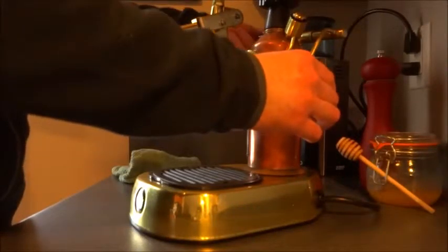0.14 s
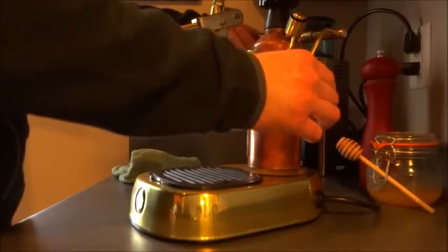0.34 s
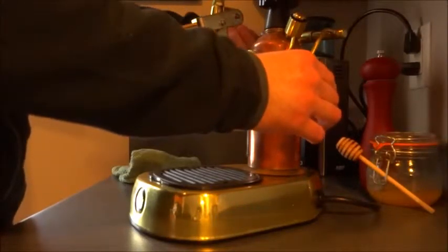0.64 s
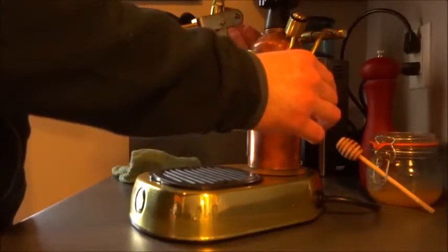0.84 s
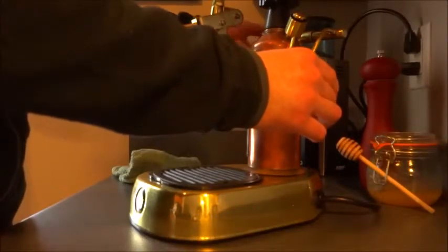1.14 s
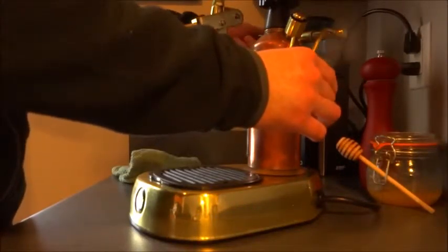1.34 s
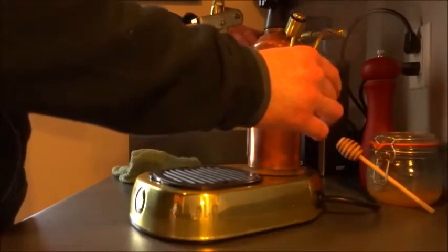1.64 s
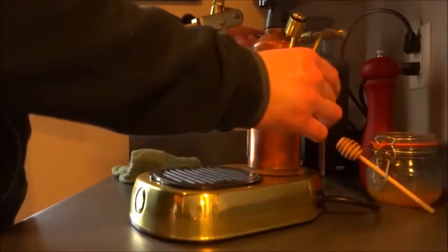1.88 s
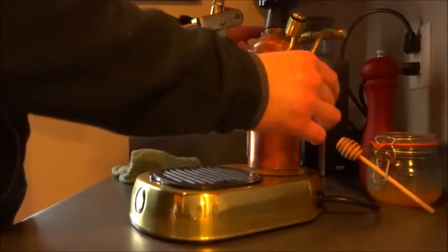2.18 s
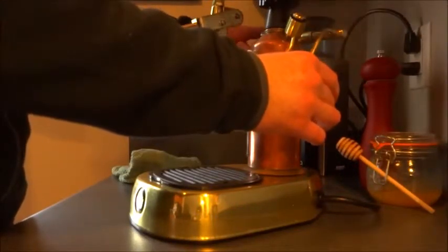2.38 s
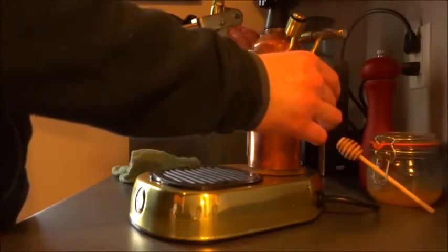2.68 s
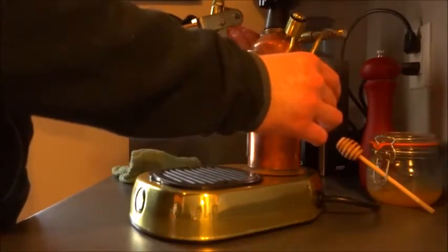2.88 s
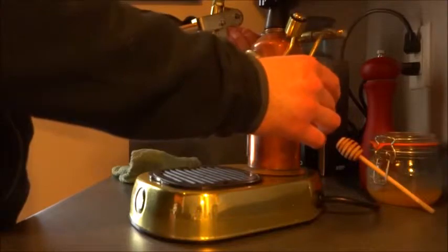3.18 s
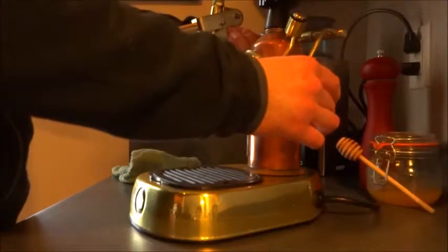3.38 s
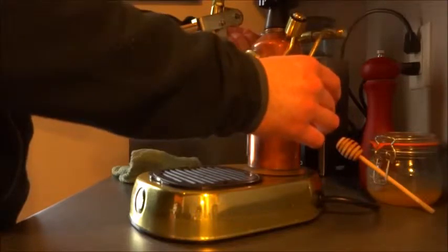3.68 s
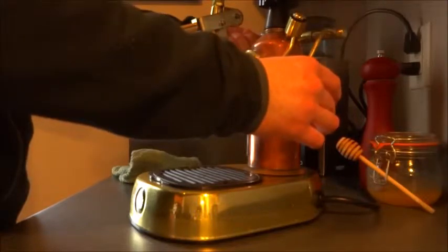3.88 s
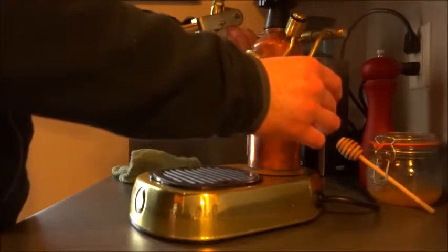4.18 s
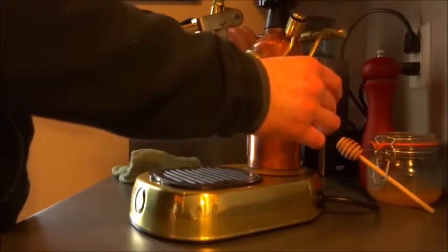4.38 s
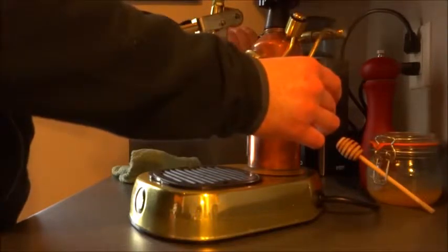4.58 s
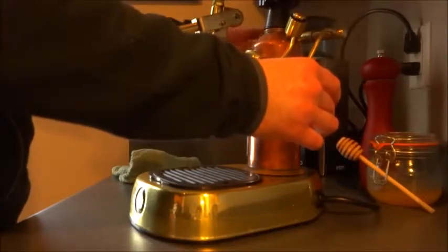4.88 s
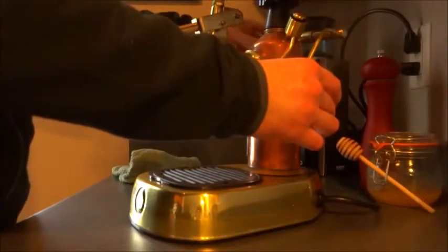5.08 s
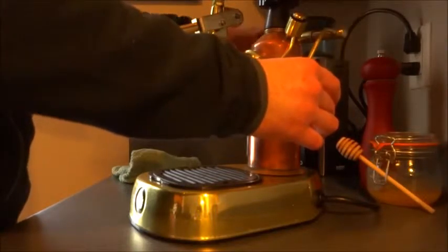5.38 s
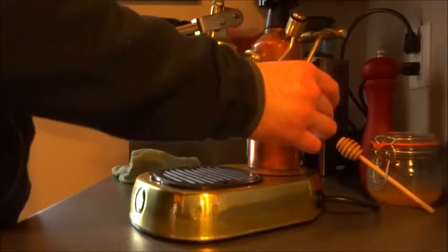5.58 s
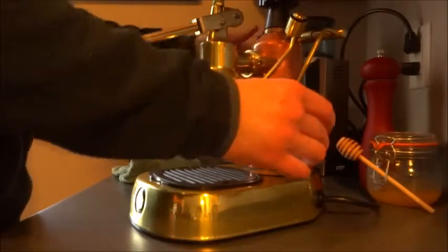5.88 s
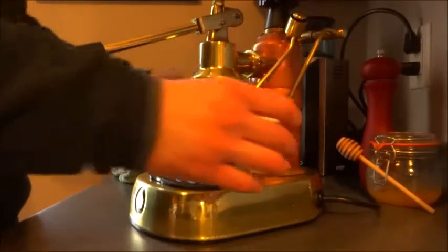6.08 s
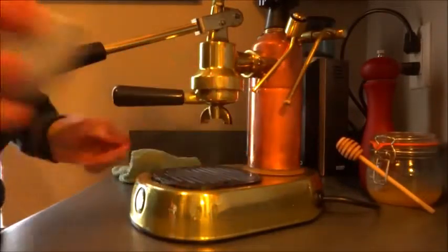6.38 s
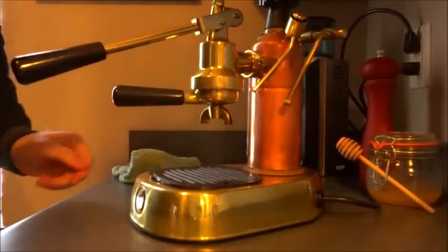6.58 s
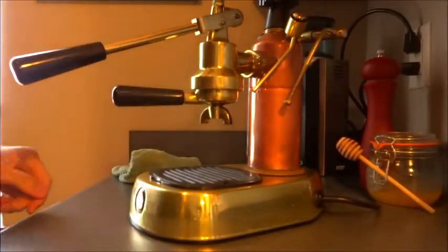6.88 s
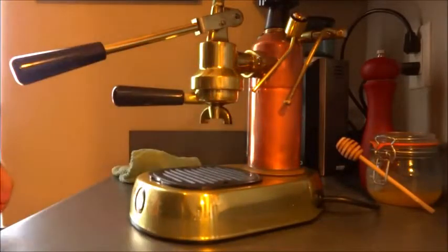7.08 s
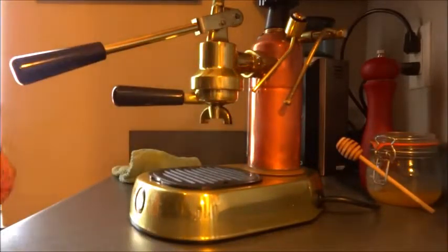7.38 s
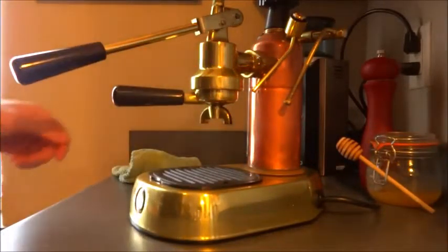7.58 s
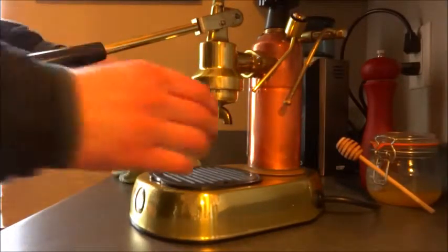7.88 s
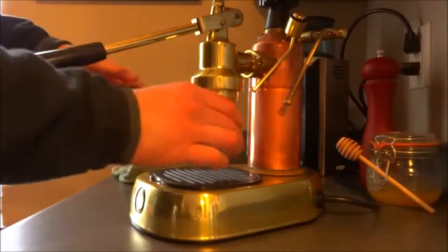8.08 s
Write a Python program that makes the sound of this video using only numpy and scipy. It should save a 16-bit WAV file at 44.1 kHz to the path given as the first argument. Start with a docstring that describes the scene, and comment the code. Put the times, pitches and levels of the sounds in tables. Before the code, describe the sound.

Close steam hiss from an espresso machine swells into a gurgling spray, then drops suddenly to a faint hiss with soft knocks.

```python
"""Steam from an espresso machine

A brass lever machine heats up on a kitchen counter, close by. Steam leaks through a valve, and its
turbulence excites the cavity's resonances. A hand opens the outlet further: a broad, wet jet takes over
and sputters until it is shut at five seconds, leaving the thinner leak. Beneath lie the simmering
boiler's rumble, a steady hum and a few soft knocks of handling."""
import sys
import numpy as np
from scipy import signal
from scipy.fft import rfft, irfft, next_fast_len
from scipy.io import wavfile
from scipy.ndimage import map_coordinates

SR = 44100
rng = np.random.default_rng(int(sys.argv[2]) if len(sys.argv) > 2 else 0)


def to_wav(sig):
    """Store sig (one row per channel, or 1-D mono) as 16-bit WAV at the path in sys.argv[1].

    Samples outside -1..1 are clipped; the rate is SR.
    """
    pcm = np.clip(np.atleast_2d(sig), -1, 1) * 32767
    pcm = np.round(pcm).astype(np.int16)
    wavfile.write(sys.argv[1], SR, pcm.T)  # frames by channels


N = 363825

# valve cavity resonances: f/Hz, width/Hz, relative level/dB at full force, the same at low force
VALVE_MODES = [(2193, 211, -6.5, -15.5), (2332, 105, -4.5, -12.5), (2529, 73, -3, -9),
               (2640, 147, -11, -11), (2821, 145, -3, -8), (3010, 78, -5, -20.5), (3108, 99, -8, -11),
               (3343, 155, -2.5, -11), (3593, 108, -2.5, -12), (3732, 118, -0.5, -11.5),
               (4045, 350, -6, -18), (4310, 92, -9.5, -13.5), (4500, 120, -1.5, -8.5), (4732, 123, -13, -9),
               (4835, 220, -3, -10.5), (5230, 160, -14, -18), (5260, 121, -17, -27), (5636, 117, -2.5, -12),
               (5774, 140, -2, -17), (6040, 340, -10.5, -22), (6450, 170, -15, -20), (7100, 520, -25, -23),
               (7250, 200, -10, -22.5), (7930, 312, -21, -32.3), (8480, 48, 2.5, -9), (8800, 440, -10, -15),
               (9060, 2000, -10.5, -19), (9850, 380, -5.5, -13.5), (10450, 170, -3.5, -8.5),
               (10766, 310, -4.5, -16.5)]
# resonances, each table: f/Hz, width/Hz, relative level/dB
OUTLET_MODES = [(2178, 156, -3.5), (2374, 120, -6.5), (2920, 73, -9), (3410, 250, -4.5), (3733, 200, -2),
                (4000, 400, -3.5), (4550, 440, -8), (4950, 240, -7.5), (5140, 440, -12), (5570, 300, -7),
                (6000, 310, -2), (6266, 170, -0.5), (6590, 260, 0.5), (7010, 330, -0.5), (7320, 150, 0.5),
                (7870, 675, -3.5), (8083, 650, -9), (8530, 240, -0.3), (8900, 230, 1), (9300, 870, -2.5),
                (9700, 160, -8.5), (10150, 880, -2), (10710, 550, 1.3)]
PIPE_MODES = [(114, 57, -24), (228, 92, -21.5), (366, 71, -13), (748, 160, -11.5), (985, 310, -10.5),
              (1266, 207, -1.5), (1333, 90, 1.5), (1495, 124, 4), (1637, 144, 0.5), (1858, 112, 1)]
SPOUT_MODES = [(825, 350, -15), (1256, 160, 3), (1480, 410, 5.5)]  # where single drops burst
COUNTER_MODES = [(240, 150, -12), (780, 170, -1), (900, 130, 3), (1190, 400, -4)]
BASE_MODES = [(126, 40, -2), (238, 54, 0.5), (374, 60, 5)]  # the machine's base
# the largest drops blown through the outlet: t/s, level/dB
DROPS = [(.118, -28), (.19, -26), (.262, -24), (.418, -28), (.66, -35), (.716, -31), (.777, -30),
         (.866, -28), (1.05, -27), (1.187, -31), (1.568, -26)]
# soft knocks of handling: t/s, level/dB
HANDLING_KNOCKS = [(6.853, -53), (6.978, -41), (7.548, -44), (7.597, -44), (7.655, -50)]
# dull bumps, from the boiler and then from the arm drawing back: t/s, level/dB, duration/s
DULL_BUMPS = [(1.565, -39.5, 0.026), (1.64, -51, 0.1), (5.8, -53, 0.15), (6.08, -68, 0.14)]
# spectrum of the boiler's rumble and the leak's low hiss: f/Hz, relative level/dB
RUMBLE_AND_HISS_SPECTRUM = [(25, -44), (55, -22), (90, -11.5), (123, -4), (152, -9.5), (225, 2),
                            (305, -1.5), (385, 3), (480, 2), (590, -4), (680, -4.5), (1150, -7.5),
                            (1800, 5.5), (2600, -34)]
# envelope of the hum: t/s, relative level/dB
HUM_ENVELOPE = [(0.0, -64.5), (2.02, -57.5), (4.73, -63), (5.1, -55), (7.76, -59), (7.9, -54.5),
                (8.25, -57)]
# kitchen reverberation: f/Hz, level/dB relative to the direct sound
REVERB_SPECTRUM = [(150, -7.5), (400, -5.5), (1200, -0.5), (2500, -8.5), (5500, -8), (9000, -11)]
# stereo balance: f/Hz, left minus right level/dB
BALANCE = [(150, -0.5), (350, 1), (700, -0.3), (1300, -1.7), (3000, -1.3), (5600, -2.5), (10000, -1.5)]

OPEN_S, OPEN_TAKES_S, SHUT_S, SHUT_TAKES_S = 1.35, .3, 5.0, .13  # the hand's two turns of the outlet


def leak(rest_db=-27, pressure_db=9, divert_db=2.06, starved_db=2.7, flutter_db=.32):
    """Cavity resonance: steam squeezes past the valve; its force shifts the weight among the modes."""
    outlet_loss_db = opening() * (divert_db + starved_db * (1 - pressure()))
    level_db = rest_db + pressure_db * pressure() - outlet_loss_db
    hard = resonant_noise([(hz, width, db) for hz, width, db, _ in VALVE_MODES])
    soft = resonant_noise([(hz, width, db) for hz, width, _, db in VALVE_MODES])
    force = valve_force()
    hiss = np.sqrt(force) * hard + np.sqrt(1 - force) * soft
    return amp(level_db + flutter_db * wobble(25)) * hiss


def jet(surge, open_db=-22.5, choke_db=1.5, surge_db=.5):
    """Turbulent jet noise: the outlet hisses; water driven through it chokes it and makes it surge."""
    level_db = open_db - choke_db * pipe_fill() * pressure() + surge_db * surge
    return amp(level_db) * opening() * resonant_noise(OUTLET_MODES)


def sputter(surge, wet_db=-36.5, pressure_db=3, dry_loss_db=9, surge_db=1.2, gurgle_db=.5, drain_s=.026):
    """Two-phase flow: condensate spits in drops, then gurgles in the pipe until the outlet is shut."""
    level_db = wet_db + pressure_db * pressure() - dry_loss_db * (1 - pipe_fill())
    flowing = 1 - ramp(SHUT_S + drain_s, SHUT_TAKES_S)
    gurgle = unit_rms(amp(surge_db * surge + gurgle_db * wobble(12)))
    stream = amp(level_db) * flowing * gurgle * resonant_noise(PIPE_MODES)
    spits = strikes(DROPS, attack_s=.007, t60_s=.18) * resonant_noise(SPOUT_MODES)
    return stream + spits


def rumble_and_hiss(shut_db=-50.5, vent_loss_db=2, build_db=2, build_s=1.2, swell_db=2.5, split_hz=550):
    """Amplitude modulation: the boiler's rumble swells unevenly; the leak's low hiss stays smooth."""
    level_db = shut_db - vent_loss_db * opening() - build_db * (1 - ramp(0, build_s))
    both = noise(lambda hz: amp(log_interp(RUMBLE_AND_HISS_SPECTRUM, hz)) / (1 + (hz / 3000) ** 4))
    rumble = filtered(both, lambda hz: 1 / (1 + (hz / split_hz) ** 4))
    leak_low_hiss = both - rumble
    swell = unit_rms(amp(swell_db * wobble(16)))
    return amp(level_db) * (leak_low_hiss + rumble * swell)


def knocks():
    """Impact excitation: soft contacts set the counter ringing dully; bumps stir the machine's base."""
    counter = strikes(HANDLING_KNOCKS, attack_s=.0021, t60_s=.1) * resonant_noise(COUNTER_MODES)
    base = swells(DULL_BUMPS) * resonant_noise(BASE_MODES)
    return counter + base


def hum(hum_hz=416.7, drift_hz=.36, gain_db=2, waver_db=.5, lead_rad=.3):
    """Standing wave: a slightly wavering room tone reaches the two microphone ports out of phase."""
    level_db = gain_db + np.interp(np.arange(N) / SR, *np.transpose(HUM_ENVELOPE))
    phase = 2 * np.pi * np.cumsum(hum_hz + drift_hz * wobble(5)) / SR
    tone = unit_rms(np.sin([phase + lead_rad, phase - lead_rad]))
    return amp(level_db + waver_db * wobble(11)) * tone


def kitchen(direct, t60_s=.32, build_s=.003, apart_hz=170):
    """Reverberation: reflections from hard walls ripple the hiss; long waves reach both ports alike."""
    t = np.arange(SR // 2) / SR
    tails = rng.standard_normal((2, len(t))) * amp(-60 * t / t60_s) * (1 - np.exp(-t / build_s))
    tails /= np.linalg.norm(tails, axis=1, keepdims=True)
    mid, side = signal.fftconvolve(direct[None], tails, axes=1)[:, :N]
    side = low_cut(side, apart_hz)
    reflections = np.array([mid + side, mid - side]) / np.sqrt(2)
    return direct + filtered(reflections, lambda hz: amp(log_interp(REVERB_SPECTRUM, hz)))


def opening(ajar=.44):
    """Throttling: the outlet's open share, 0-1, is ajar, turned wide, then shut."""
    return (ajar + (1 - ajar) * ramp(OPEN_S, OPEN_TAKES_S)) * (1 - ramp(SHUT_S, SHUT_TAKES_S))


def pressure(vent_takes_s=2.58):
    """Venting: the boiler's excess pressure falls from 1 to 0 once the outlet is turned wide."""
    return 1 - ramp(OPEN_S, vent_takes_s)


def valve_force(rebound=.48, settle_s=.54):
    """Pressure surge: shutting the outlet briefly throws force, 0-1, back on the valve."""
    since_shut = np.maximum(np.arange(N) / SR - SHUT_S - SHUT_TAKES_S, 0)
    kick = rebound * ramp(SHUT_S, SHUT_TAKES_S) * np.exp(-since_shut / settle_s)
    return np.clip(pressure() + kick, 0, 1)


def pipe_fill():
    """Condensation: water fills the pipe, 0-1."""
    return ramp(start_s=.63, length_s=.65)


def resonant_noise(modes):
    """Random excitation of steep-skirted resonances (f/Hz, width/Hz, level/dB), which add in power."""
    def gain(hz):
        peaks = (amp(db) / (1 + (2 * (hz - centre) / width) ** 2) for centre, width, db in modes)
        return np.sqrt(sum(peak ** 2 for peak in peaks))
    return noise(gain)


def noise(response):
    """Spectral shaping of white noise, at rms 1."""
    return unit_rms(filtered(rng.standard_normal(N), response))


def strikes(rows, attack_s, t60_s):
    """Damping: a quick rise and an exponential decay for each row (t/s, level/dB)."""
    ages = [(np.maximum(np.arange(N) / SR - start, 0), db) for start, db in rows]
    return sum(amp(db - 60 * age / t60_s) * (1 - np.exp(-age / attack_s)) for age, db in ages)


def swells(rows):
    """A half-sine pulse for each row (t/s, level/dB, duration/s)."""
    return sum(amp(db) * np.sin(np.pi * ramp(start, length)) for start, db, length in rows)


def ramp(start_s, length_s):
    """Linear rise from 0 to 1."""
    return np.clip((np.arange(N) / SR - start_s) / length_s, 0, 1)


def wobble(rate):
    """Random modulation: a spline with rate knots a second."""
    knots = rng.standard_normal(int(N * rate / SR) + 4)
    return map_coordinates(knots, [np.arange(N) * rate / SR])


def filtered(x, response):
    """Zero-phase filtering: the spectrum of x times response(f/Hz)."""
    size = next_fast_len(N + SR // 2)
    return irfft(rfft(x, size) * response(np.fft.rfftfreq(size, 1 / SR)), size)[..., :N]


def low_cut(x, corner_hz):
    """Second-order high-pass slope."""
    return filtered(x, lambda hz: hz ** 2 / (hz ** 2 + corner_hz ** 2))


def log_interp(points, hz):
    """Interpolation of (f/Hz, level/dB) points on a log frequency axis."""
    f, db = np.transpose(points)
    return np.interp(np.log(hz + 1), np.log(f + 1), db)


def amp(db):
    """Decibels to amplitude ratio."""
    return 10 ** (np.asarray(db) / 20)


def unit_rms(x):
    """Normalisation to rms 1."""
    return x / np.sqrt(np.mean(x ** 2) + 1e-20)


def scene():
    """Superposition: the sources add in the kitchen, with the machine a little to the right."""
    surge = unit_rms(wobble(35) + wobble(100))  # jet and sputter share one uneven flow
    machine = leak() + jet(surge) + sputter(surge) + rumble_and_hiss() + knocks()
    sound = amp(-.27) * kitchen(machine) + hum()
    return filtered(sound, lambda hz: amp(np.outer([.5, -.5], log_interp(BALANCE, hz))))


def record(dry, low_cut_hz=36, top_hz=11030):
    """Band limiting: the microphone thins the deep bass and cuts off steeply above its upper limit."""
    thinned = low_cut(dry, low_cut_hz)
    return filtered(thinned, lambda hz: amp(-.6 * np.clip(hz - top_hz, 0, 200)))


dry = scene()
out = record(dry)
to_wav(out)
```